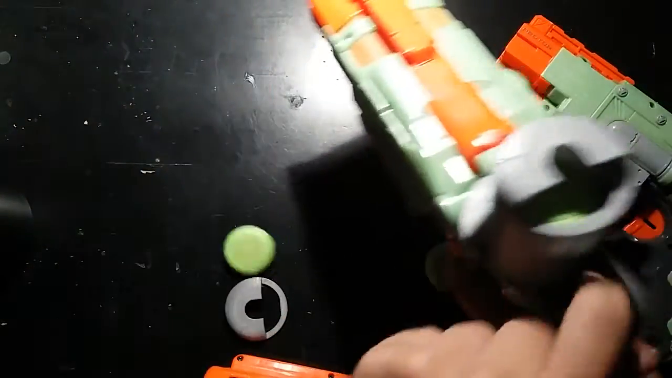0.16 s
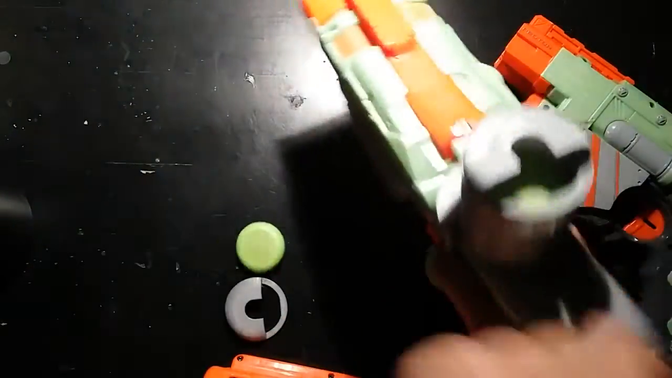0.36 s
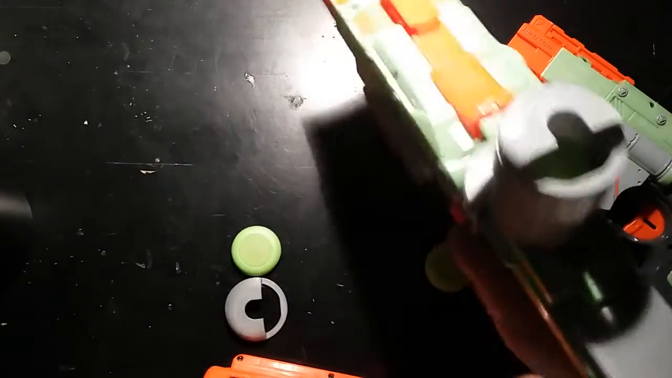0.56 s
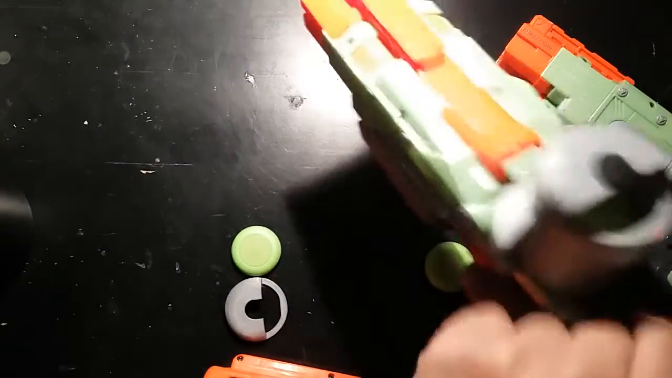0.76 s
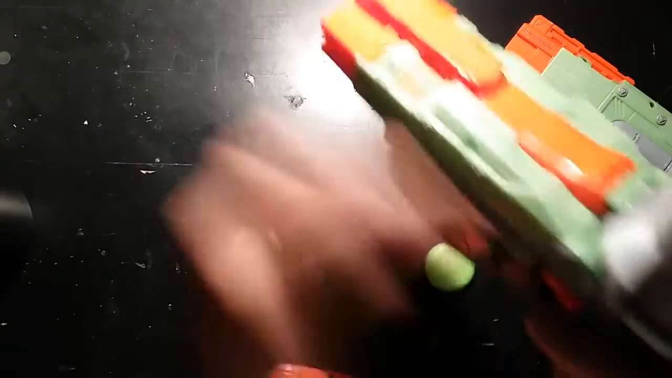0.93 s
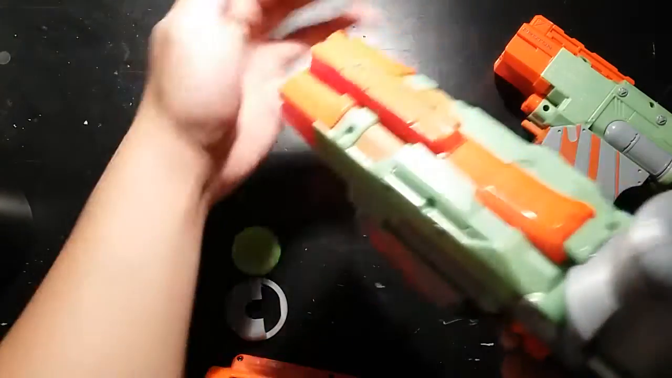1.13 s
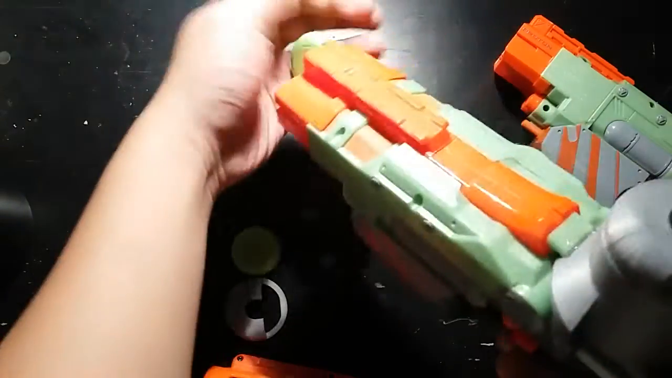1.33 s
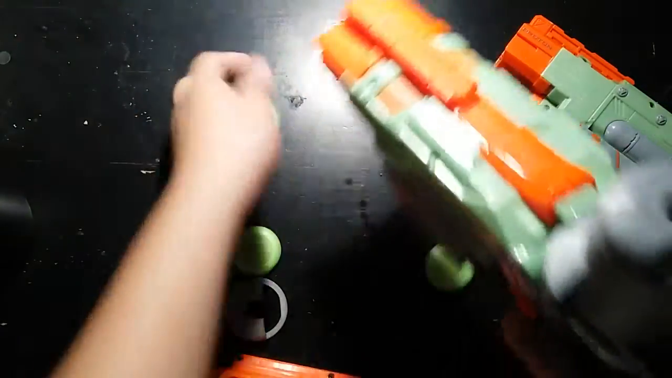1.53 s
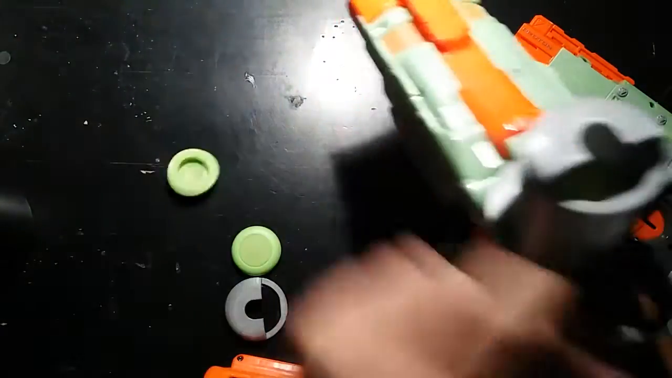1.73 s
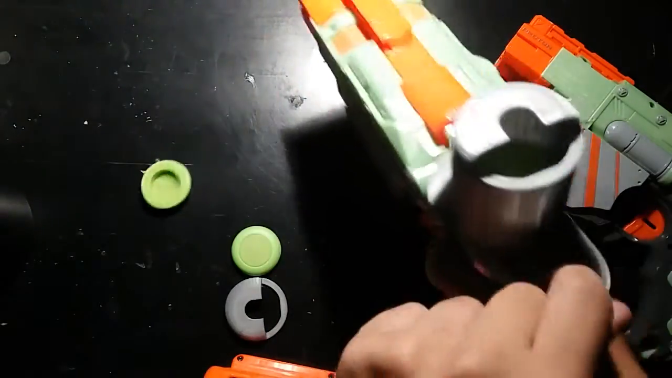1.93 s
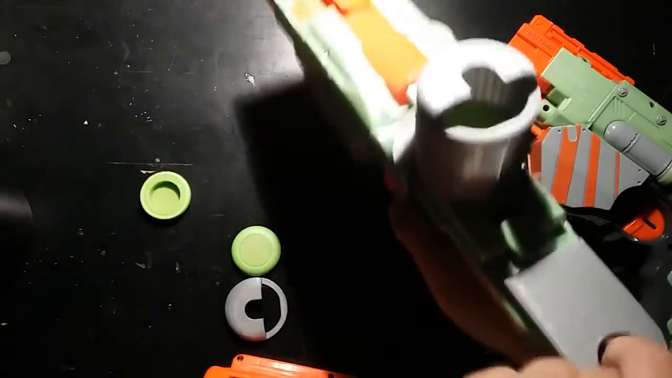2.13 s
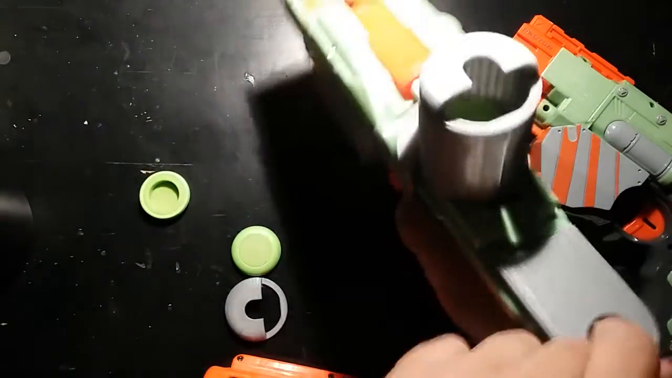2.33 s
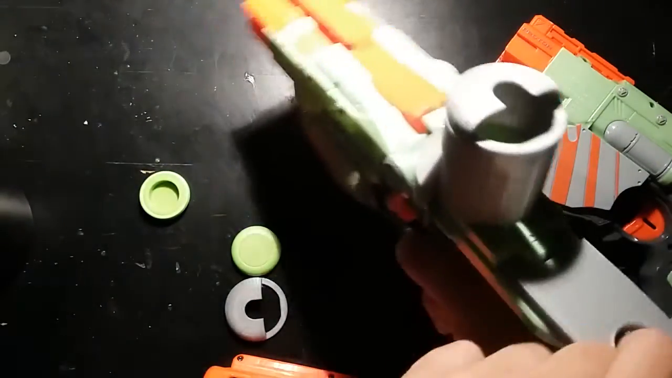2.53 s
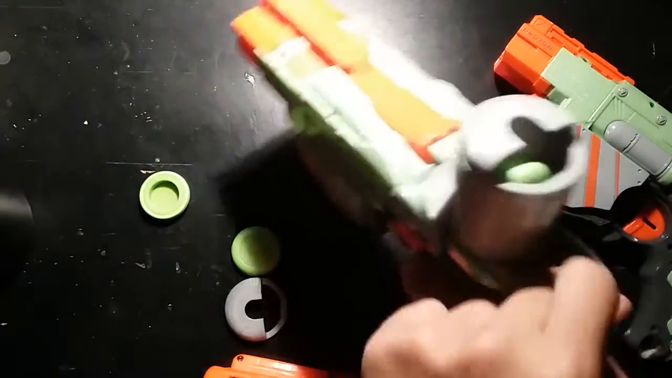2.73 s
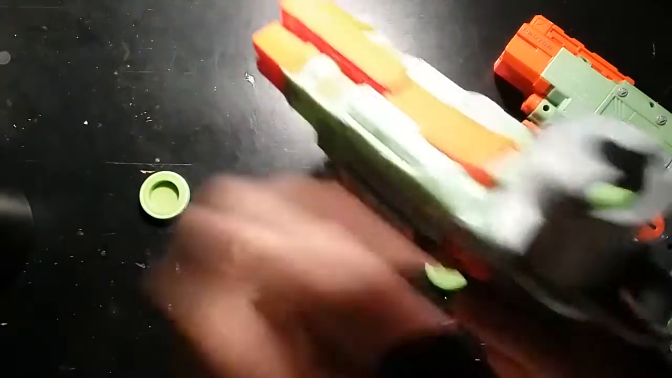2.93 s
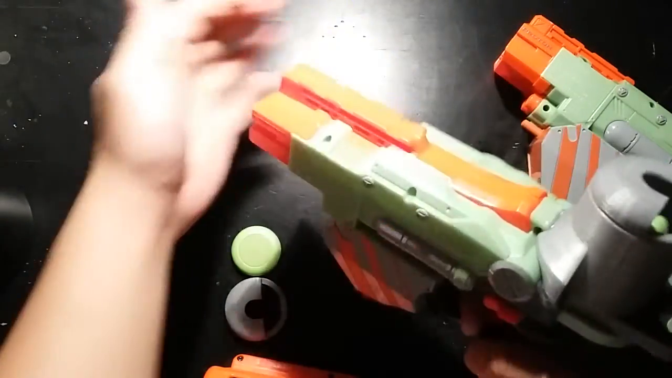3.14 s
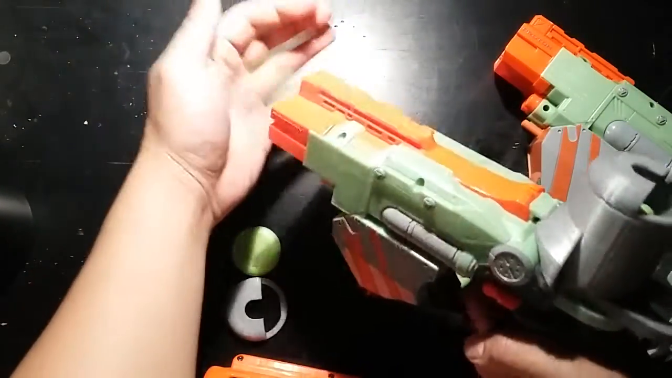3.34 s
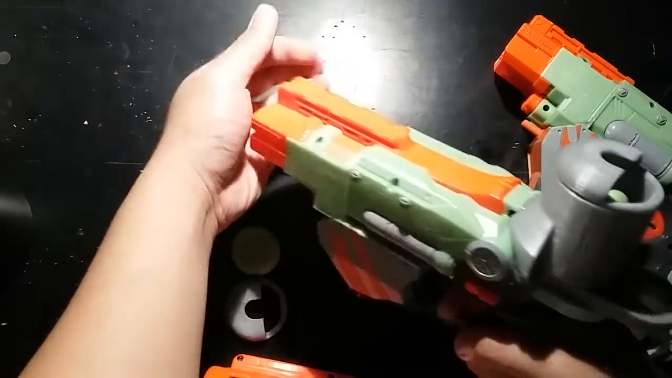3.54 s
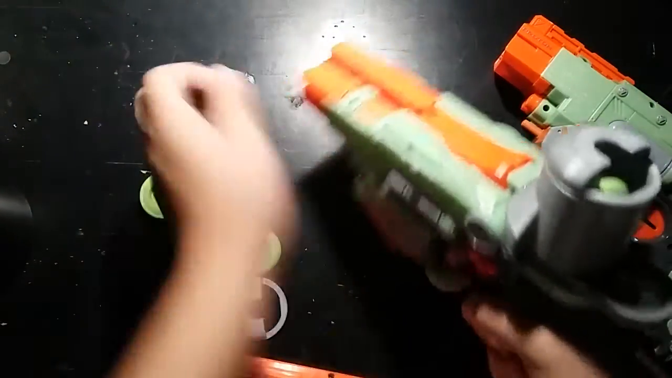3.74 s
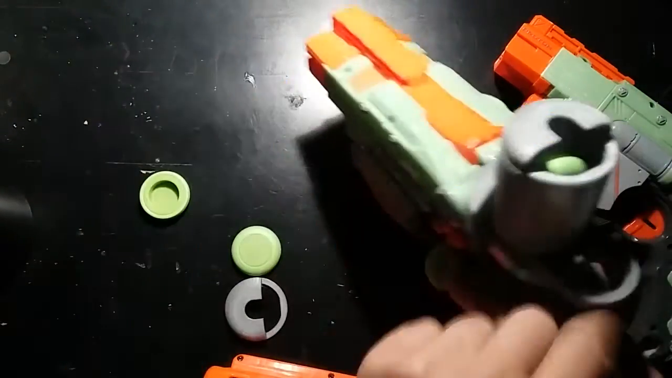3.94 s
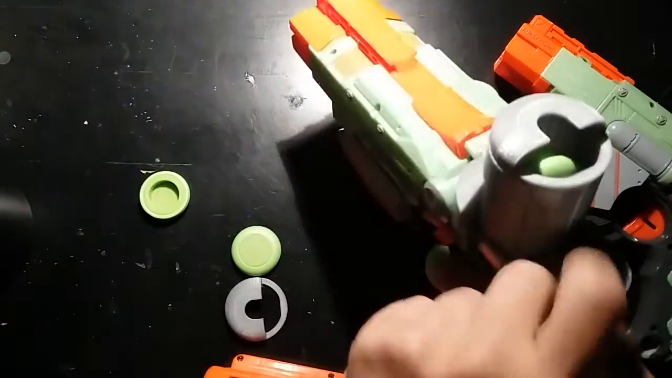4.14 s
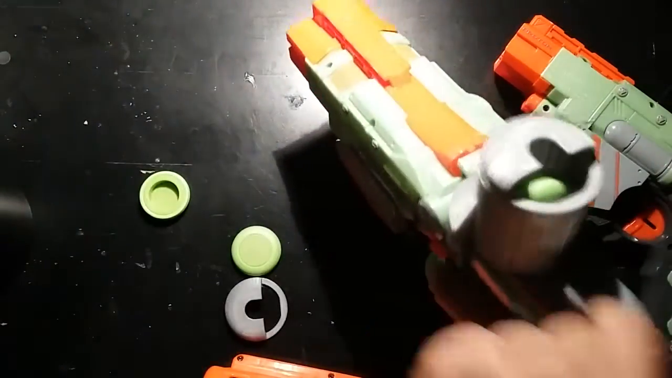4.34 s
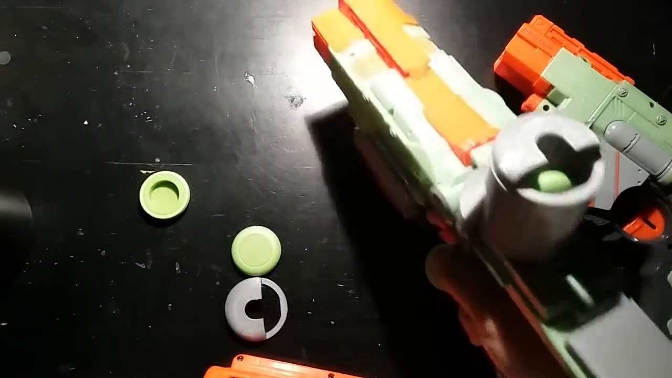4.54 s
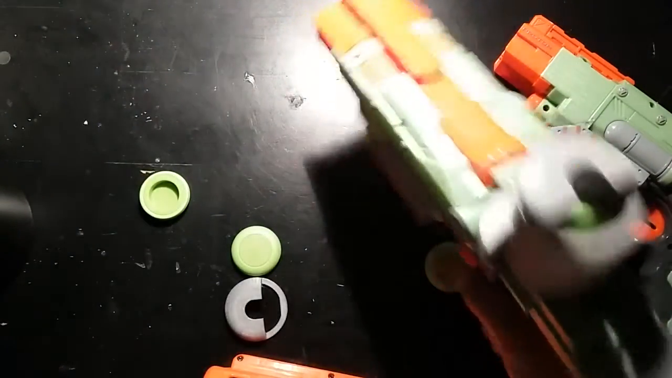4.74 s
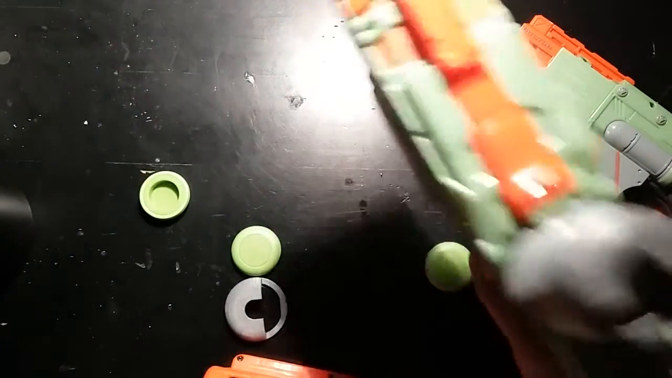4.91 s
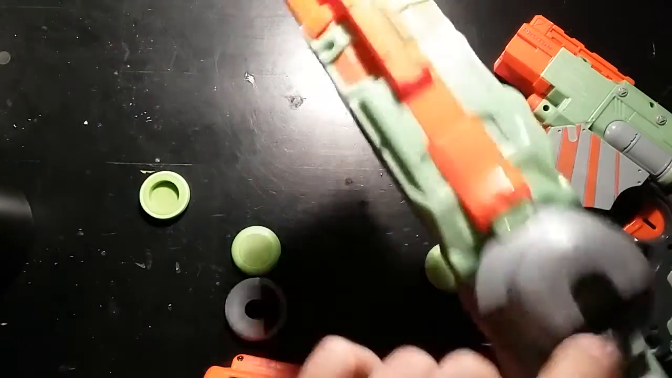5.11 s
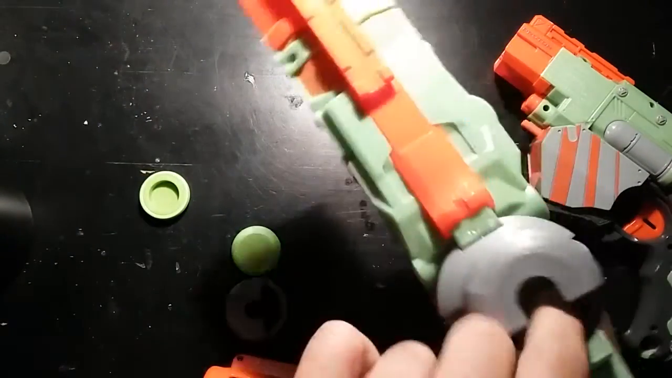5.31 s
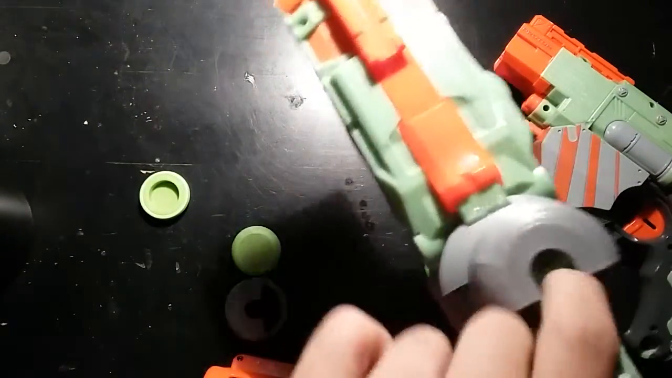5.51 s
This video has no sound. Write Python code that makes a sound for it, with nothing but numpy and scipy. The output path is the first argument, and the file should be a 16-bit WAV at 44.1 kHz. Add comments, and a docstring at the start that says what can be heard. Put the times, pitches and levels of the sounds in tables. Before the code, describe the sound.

Close, hard plastic snaps and slide slams from a toy disc launcher, two springy shots, a dull table thud, then quiet fumbling.

```python
"""A plastic toy disc blaster over a table in a small room, heard by one close microphone.
The slide is pulled, scraping over its catches, and slams through the hollow shell; a first shot
follows and leaves the spring ringing. A second pull and a second shot come next, then discs and
hands thump the tabletop. After a third pull, fingers rub and drag over the magazine to the end.
Blows are coloured noise and ringing modes, rubs are dense tiny catches; air and a low drone lie below."""
import sys
import numpy as np
from scipy import signal
from scipy.fft import rfft, irfft, next_fast_len
from scipy.io import wavfile
from scipy.ndimage import uniform_filter1d

SR = 44100
rng = np.random.default_rng(int(sys.argv[2]) if len(sys.argv) > 2 else 0)


def log_audio(samples):
    """Write samples as a 16-bit WAV file to the path given in sys.argv[1]."""
    # one column per channel
    frames = np.atleast_2d(samples).T
    # limit to full scale, then quantise
    limited = np.clip(frames, -1, 1)
    pcm = np.round(limited * 32767).astype(np.int16)
    wavfile.write(sys.argv[1], SR, pcm)


N = 250047
TIME = np.arange(N) / SR
RING = np.arange(2 ** 15) / SR  # the time axis of one ringing sound, in seconds


def undb(db):
    """Decibels to gain."""
    return 10 ** (np.asarray(db) / 20)


def unit(x):
    """Scale to rms 1."""
    return x / np.sqrt(np.mean(x ** 2))


def fade(t, t60):
    """Exponential decay, 60 dB down after t60."""
    return np.exp(-np.log(1000) * t / t60)


def add(track, s, sound):
    """Mix a sound into a track at time s."""
    i = max(int(s * SR), 0)
    track[i:i + len(sound)] += sound[:N - i]


def resonance(x, hz, q):
    """Two-pole band-pass, gain 1 at the centre."""
    return signal.lfilter(*signal.iirpeak(hz, q, fs=SR), x)


def colour(x, points, bass_db=0, treble_db=0):
    """Causal filter through (Hz, dB) points with two shelves; flat shelves keep the power of white noise."""
    size = next_fast_len(len(x) // 2 + 1024) * 2
    f = np.arange(size // 2 + 1) * SR / size + 1
    hz, db = np.transpose(points)
    gain = unit(undb(np.interp(np.log(f), np.log(hz), db)))
    bass_shelf = bass_db / (1 + (f / 1050) ** 4)
    treble_shelf = treble_db / (1 + (5000 / f) ** 3)
    gain = gain * undb(bass_shelf + treble_shelf)
    # folding the cepstrum forward in time gives minimum phase
    cepstrum = irfft(np.log(gain))
    cepstrum[1:size // 2] *= 2
    cepstrum[size // 2 + 1:] = 0
    return irfft(rfft(x, size) * np.exp(rfft(cepstrum)))[:len(x)]


def ring(modes, scatter_db, detune):
    """Struck modes; the point of contact and the grip change their levels and pitch a little."""
    hz, db, t60 = np.transpose(modes)[:, :, None]
    level_chance, pitch_chance = rng.uniform(-1.2, 1, (2, len(modes), 1))
    t = RING[:int(min(t60.max(), RING[-1]) * SR)]
    sign = (-1) ** np.arange(len(modes))[:, None]  # neighbouring modes swing in opposite directions
    swing = np.cos(2 * np.pi * hz * (1 + detune * pitch_chance) * t)
    return np.sum(sign * undb(db + scatter_db * level_chance) * fade(t, t60) * swing, axis=0)


def blows(rows, spectrum, modes, modes_db, scatter_db, detune, spread_s, part_db, part_q):
    """Plastic on plastic: a short blur of crowded wall modes, the struck part's resonance, and ringing modes."""
    out, t = np.zeros(N), RING[:2 ** 12]
    for s, db, bass_db, treble_db, t60, part_hz in rows:
        walls = rng.standard_normal(len(t)) * fade(t, max(t60, .01))
        walls *= 1 - np.exp(-t / spread_s)  # the blow takes a moment to spread
        walls *= np.sqrt(SR / 100 / np.sum(walls ** 2))  # the energy of 10 ms at rms 1
        walls += undb(part_db) * resonance(walls, part_hz, part_q)
        shelved = [(hz, mode_db + bass_db / (1 + (hz / 1000) ** 4), decay) for hz, mode_db, decay in modes]
        tones = ring(shelved, scatter_db, detune)
        add(out, s, undb(db) * colour(walls, spectrum, bass_db, treble_db))
        add(out, s, undb(db + modes_db) * tones)
    return out


# The launcher snapping forward and hitting its stop. Each row: start in seconds, level in dB before
# the overall shot gain, bass in dB, treble in dB, t60 in s, resonance of the struck part in Hz.
LAUNCHER_BLOWS = [(1.2836, -15, 1, 2.5, 0.072, 2800), (1.2905, -16, 3.5, -12, 0.05, 1050),
                  (1.296, -19, -1, -6.5, 0.029, 1700), (3.4215, -14.5, -3.5, -4.5, 0.035, 1950),
                  (3.4275, -16.5, 3.5, -0.5, 0.039, 1450), (3.435, -30, 13.5, 8.5, 0.083, 480)]
# How a launcher blow is coloured, close to the microphone. Each row: frequency in Hz, density in dB per Hz.
LAUNCHER_SPECTRUM = [(60, -27.5), (130, -33.5), (350, -3.5), (700, -4.5), (850, -9), (1000, -2.5),
                     (1600, 1.5), (2600, -5.5), (3600, -8.5), (5100, -8), (6500, -23), (8500, -28),
                     (16000, -33.5)]
# What rings in launcher and barrel. Each row: frequency in Hz, relative level in dB, t60 in s.
LAUNCHER_MODES = [(117, -29, 0.25), (201, -25, .14), (259, -23.5, 0.17), (363, -18.5, 0.2),
                  (516.6, -11.5, 0.13), (698.6, 0, 0.078), (1055, -7, 0.038), (1203, -16, .06),
                  (1373, -7.5, 0.039), (1445, -14.5, 0.1), (1555, -5, 0.057), (1770, -17, 0.02),
                  (2018, -9.5, 0.098), (2230, -16.5, .07)]


def shots():
    """Each shot is three quick blows of the launcher, ringing the barrel."""
    return undb(-1.5) * blows(LAUNCHER_BLOWS, LAUNCHER_SPECTRUM, LAUNCHER_MODES, modes_db=-1.5, scatter_db=2.5,
                              detune=.006, spread_s=0.00063, part_db=4.5, part_q=8.0)


# How the hollow shell colours its blows and rubs. Each row: frequency in Hz, density in dB per Hz.
SHELL_SPECTRUM = [(60, -41.5), (180, -17), (340, -6.5), (700, -0.5), (1150, -1), (1700, 1), (3500, -2),
                  (5200, -5.5), (6500, -16), (8500, -22), (12000, -26), (16000, -37.5)]
# What rings in the hollow shell. Each row: frequency in Hz, relative level in dB, t60 in s when no hand damps it.
FREE_SHELL_MODES = [(330, -14.5, 0.16), (413, -13, 0.15), (486, -14.5, 0.29), (706.7, -8, 0.14),
                    (764, -7, 0.18), (833, -14, 0.12), (930, -9, 0.26), (1430, -9, 0.11),
                    (1550, -7.5, 0.25), (1789, -13, 0.03), (2145, -11, 0.2), (2297, -4, 0.097),
                    (2500, -11, .09), (2800, -6.5, 0.17), (3580, -11, 0.069), (4070, -19, 0.11),
                    (4230, -15, 0.19), (4910, -8, 0.023)]


def shell_blows(rows, free=0.74, **settings):
    """Blows on the shell, whose modes keep only a share of their ring time in the damping hand."""
    gripped = [(hz, db, t60 * free) for hz, db, t60 in FREE_SHELL_MODES]
    return blows(rows, SHELL_SPECTRUM, gripped, **settings)


# The slide slamming into either end. Each row: time of the stop in seconds, level in dB and level of the
# sear just before in dB (both before the overall slam gain), time between contacts in s, bass in dB,
# resonance in Hz.
SLIDE_SLAMS = [(0.513, -16, -26.5, 0.01, -1, 5060), (0.767, -16.5, -22, 0.0085, 2.5, 4710),
               (2.221, -16, -29, 0.0108, -1.5, 2700), (2.716, -16, -16.5, 0.009, 3, 3630),
               (4.525, -19.5, -24.5, 0.013, 5, 734)]


def slams(graze_db=-4.5, rebound_db=-5, glancing_bass_db=-8.5):
    """A slam is four contacts: the sear trips, the slide grazes its stop, hits it and rebounds."""
    rows = []
    for s, db, sear_db, gap, bass_db, hz in SLIDE_SLAMS:
        rows.append((s, db, bass_db, 6, 0.048, hz))  # the stop: treble 6 dB, t60 0.048 s
        glancing = (s - 2 * gap, sear_db), (s - gap, db + graze_db), (s + gap, db + rebound_db)
        for at, level in glancing:
            rows.append((at, level, bass_db + glancing_bass_db, 2, 0.072, hz))  # treble 2 dB, t60 0.072 s
    return undb(-1.5) * shell_blows(rows, modes_db=-6.0, scatter_db=5.0, detune=.028, spread_s=0.0013,
                                    part_db=-1.5, part_q=11.0)


def light_contact(s, db, treble_db, hz, firm_db=-35.5, part_hz=1400):
    """One light blow on the shell: firmer on a smaller part is thinner, and firmer chatters longer."""
    force = db - firm_db
    # 1 dB of bass at the reference level and pitch, less per dB and per octave above them
    bass_db = 1 - 0.21 * force - 2 * np.log2(hz / part_hz)
    t60 = 0.053 * 2 ** (force / 46)  # doubles every 46 dB
    return s, db, bass_db, treble_db, t60, hz


# The slide leaving its rest on each pull. Each row: start in seconds, level of its catches in dB before
# the overall latch gain, end of its scraping in seconds, level of its scraping in dB.
SLIDE_PULLS = [(0.409, -27, 0.53, -42.5), (2.108, -27.5, 2.18, -41.5), (4.405, -30, 4.53, -44.5)]
# The catches that every pull trips in turn. Each row: time after the start in seconds, level in dB
# relative to the pull, treble in dB, resonance in Hz.
PULL_CATCHES = [(0, -12, 4, 2550), (0.026, -8, -3, 4180), (0.033, -2, 2.5, 2995), (0.056, -10, 12.5, 2100)]
# Latches that touch and then snap shut. Each row: time of the snap in seconds, level in dB before the
# overall latch gain, time since the touch in s, treble in dB, resonance in Hz.
LATCH_SNAPS = [(0.314, -33.5, 0.007, -0.5, 1580), (1.473, -26, 0.0092, 4, 2700),
               (2.009, -30.5, 0.011, 0.5, 1425), (2.679, -29, 0.0075, 2.5, 2560),
               (3.635, -25.5, 0.014, 1, 1870), (4.016, -32, 0.0061, -5.5, 3000),
               (4.403, -31.5, 0.01, 1, 2500)]


def latches(touch_db=-6.5):
    """The sprung parts: the catches along each pull and the two-part snaps."""
    rows = []
    for s, db, _, _ in SLIDE_PULLS:
        for lag, catch_db, treble_db, hz in PULL_CATCHES:
            rows.append(light_contact(s + lag, db + catch_db, treble_db, hz))
    for s, db, lead, treble_db, hz in LATCH_SNAPS:
        rows.append(light_contact(s - lead, db + touch_db, treble_db, hz))
        rows.append(light_contact(s, db, treble_db, hz))
    return undb(-2.5) * shell_blows(rows, modes_db=-5.5, scatter_db=5.5, detune=0.031, spread_s=0.0018,
                                    part_db=3.5, part_q=4.5)


# The released coil, heard close by. Each row: start in seconds, level in dB, middle of its final fade in seconds.
SPRING_RINGS = [(1.297, -35, 1.76), (2.413, -56.5, 2.5), (3.43, -32.5, 3.78)]
# How the crowd of coil modes is coloured. Each row: frequency in Hz, density in dB per Hz.
COIL_SPECTRUM = [(400, -18), (1100, -3), (1450, 0), (2000, 5), (2700, 1), (3200, -2.5), (3800, -3),
                 (5200, -8), (6500, -21.5), (12000, -39.5)]
# The strongest modes of the spring. Each row: frequency in Hz, relative level in dB, t60 in s.
COIL_MODES = [(1470, -6.5, 1.2), (1290, -18, 1.9), (1446, -5.5, .5), (1570, -17.5, 1.3), (2080, -16, 2),
              (2379, -14, 1.3), (2650, -15, 1), (3800, -20, 1.3), (4050, -15.5, 0.67), (4170, -21.5, 1.3),
              (4727, -21.5, 1.1), (5200, -23, 1.5)]


def spring(t60=1.0, settle_s=0.021, modes_db=-1):
    """The released coil shivers in a crowd of slowly fading modes, a few standing out, until it comes to rest."""
    out = np.zeros(N)
    for s, db, end in SPRING_RINGS:
        shiver = unit(colour(rng.standard_normal(len(RING)), COIL_SPECTRUM)) * fade(RING, t60)
        add(shiver, 0, undb(modes_db) * ring(COIL_MODES, scatter_db=2, detune=.002))
        settling = np.clip((end - s - RING) / settle_s + .5, 0, 1)
        add(out, s, undb(db) * shiver * settling)
    return out


# Single clicks of trigger, magazine and discs on the shell, and the sharp contact clicks of three knocks on #
# the tabletop. Each row: time in seconds, level in dB before the overall click gain, treble in dB, resonance in
# Hz.
SHELL_CLICKS = [(0.196, -39, -4.5, 1500), (0.27, -43, -14, 3000), (0.296, -39.5, -2, 1220),
                (0.654, -35.5, -12, 730), (0.673, -38, 0, 700), (0.707, -24, 5.5, 1780),
                (0.73, -23, 8.5, 4650), (0.82, -32.5, -13, 2510), (0.856, -43.5, -12, 1850),
                (0.91, -38, 4, 700), (0.981, -54.5, -5, 1430), (1.119, -53.5, -27.5, 700),
                (1.142, -51, -18, 590), (1.183, -47.5, -3.5, 600), (1.254, -40, -7, 646),
                (1.724, -37, -11, 905), (1.841, -46, -16, 598), (1.879, -35, -5.5, 1570),
                (2.341, -35, -3.5, 1855), (2.358, -36, -1, 694), (2.396, -27.5, 5.5, 2649),
                (2.602, -52.5, -14, 1900), (3.156, -49.5, -29, 2047), (3.352, -43.5, -24, 606),
                (3.982, -48, -1, 596), (4.163, -46, 1.5, 1480), (4.233, -52, -6, 596),
                (4.276, -41.5, -7.5, 950), (4.706, -34, -8, 1680), (4.752, -35, -19, 720),
                (4.902, -46, 2, 850), (4.937, -38.5, -19, 1540), (5.127, -43.5, -16, 860),
                (5.186, -41.5, -17, 1140), (5.232, -39, -44, 1700), (5.336, -39.5, -9, 1260),
                (5.363, -46, 3, 700), (5.426, -46, -4.5, 2090), (5.628, -42.5, -20, 1010)]


def clicks():
    """Each click is one light blow, coloured like a blow on the shell."""
    rows = [light_contact(*click) for click in SHELL_CLICKS]
    return undb(-1.5) * shell_blows(rows, modes_db=-6.5, scatter_db=5.0, detune=.028, spread_s=0.0011,
                                    part_db=4.0, part_q=11)


# Discs and hands landing on the tabletop below the microphone. Each row: time in seconds, level in dB,
# softness corner in Hz before the 1.27 stretch, share of the board's ring time.
TABLE_KNOCKS = [(0.001, -42, 370, 0.26), (0.064, -49.5, 327, 1), (0.2, -50, 300, 1),
                (1.636, -35.5, 740, 0.44), (1.723, -41, 1130, 0.86), (3.757, -27.5, 296, 0.83),
                (3.77, -25.5, 218, 0.78), (3.982, -25.5, 1065, 0.38), (4.233, -41, 548, 0.57),
                (4.377, -42, 456, 0.36)]
# What rings in the tabletop. Each row: frequency in Hz, relative level in dB, t60 in s with no hand resting on it.
BOARD_MODES = [(48, -30.5, 0.41), (103.6, -31.5, 0.6), (143.6, -14, 0.94), (200.2, 1, 0.23),
               (226.6, -7.5, 0.59), (288, -9.5, 0.21), (324.4, 5, 0.082), (397, -6.5, 0.32),
               (502, 0, 0.078), (711, -3, 0.15), (868, 5.5, 0.045), (1074, -8, 0.073), (1200, -60, .04)]
# The low hollow rumble in the knocks and in the dragged magazine. Each row: frequency in Hz, density in dB per Hz.
HOLLOW_SPECTRUM = [(40, -27), (110, -10.5), (170, -2.5), (225, -1.5), (330, -4.5), (450, -8), (900, -34.5),
                   (4000, -50)]


def tabletop(thud_db=-7, thud_t60=0.28):
    """Dull thumps: softer contacts reach fewer high modes of the board; a resting hand damps them."""
    out = np.zeros(N)
    for s, db, corner_hz, free in TABLE_KNOCKS:
        damped = [(hz, mode_db, t60 * free) for hz, mode_db, t60 in BOARD_MODES]
        board = ring(damped, scatter_db=2, detune=.01)
        thud = unit(colour(rng.standard_normal(len(RING)), HOLLOW_SPECTRUM)) * fade(RING, thud_t60)
        softness = signal.butter(5, corner_hz * 1.27, fs=SR, output="sos")
        add(out, s, undb(db) * signal.sosfilt(softness, board))
        add(out, s, undb(db + thud_db) * signal.sosfilt(softness, thud))
    return out


# Soft bumps of the palm on the grip. Each row: start in seconds, level in dB, pitch in Hz, t60 in s.
PALM_BUMPS = [(1.59, -49.5, 74, 0.18), (3.756, -23, 135.6, 0.19), (3.757, -35, 97, 0.66),
              (3.757, -45, 48.4, .45), (5.321, -34.5, 133, 0.23)]
# The hand dragging over the hollow magazine. Each row: time in seconds, level in dB.
MAGAZINE_DRAG = [(4.6, -80), (4.85, -58.5), (4.93, -56.5), (5.25, -54), (5.42, -65.5), (5.67, -63)]


def handling(push_s=0.0036, unsteady_db=1.5):
    """The palm bumps the grip with slow, soft pushes and drags unevenly over the magazine."""
    pressure = unit(uniform_filter1d(rng.standard_normal(N), size=1800))  # averaged over about 41 ms
    drag_db = np.interp(TIME, *np.transpose(MAGAZINE_DRAG)) + unsteady_db * pressure
    out = unit(colour(rng.standard_normal(N), HOLLOW_SPECTRUM)) * undb(drag_db)
    for s, db, hz, t60 in PALM_BUMPS:
        push = 1 - np.exp(-(RING / push_s) ** 2)
        add(out, s, undb(db) * push * fade(RING, t60) * np.sin(2 * np.pi * hz * RING))
    return out


# Plastic rubbing under the fingers. Each row: start in seconds, end in seconds, level in dB, catches per second,
# treble in dB.
FINGER_RUBS = [(0.297, 0.44, -53.5, 350, -4), (0.587, 0.715, -51, 137, -4), (2.388, 2.402, -40, 2100, -5),
               (2.653, 2.684, -52.5, 950, 7), (3.335, 3.419, -62, 100, -31), (4.131, 4.168, -56, 370, -10),
               (4.69, 5.67, -62.5, 1300, 2), (4.868, 5.304, -61, 45, -33)]


def slides(rush_s=0.042, rush_db=2.5):
    """Every sliding contact: the fingers, and the slide, which scrapes harder in its last moment."""
    rows = [(start, end, db, rate, 9.5, treble_db) for start, end, db, rate, treble_db in FINGER_RUBS]  # bass 9.5 dB
    for s, _, end, db in SLIDE_PULLS:
        third_catch = s + PULL_CATCHES[2][0]
        for start, level in (third_catch, db), (end - rush_s, db + rush_db):
            rows.append((start, end, level, 260, 3, -2))  # 260 catches/s, bass 3 dB, treble -2 dB
    return rows


def rubbing(spread_db=10.5, catch_t60=0.11):
    """Sliding contact: tiny uneven catches, each briefly ringing the shell."""
    out = np.zeros(N)
    tail = fade(RING[:2 ** 11], catch_t60) ** 2  # decay of power
    size = 2 ** 16
    for start, end, db, rate, bass_db, treble_db in slides():
        dice, force, grain = rng.random(size), rng.exponential(size=size), rng.standard_normal(size)
        sliding = np.arange(size) / SR < end - start
        strength = unit(undb(spread_db * np.minimum(force, 2)))
        catches = sliding * (dice < rate / SR) * strength * np.sqrt(SR / rate)
        power = np.abs(signal.fftconvolve(catches ** 2, tail / tail.sum())[:size])
        add(out, start, undb(db) * colour(np.sqrt(power) * grain, SHELL_SPECTRUM, bass_db, treble_db))
    return out


# Loose parts ticking while the grip shifts. Each row: start in seconds, end in seconds, middle level in dB,
# treble in dB.
GRIP_FIDGETS = [(3.19, 3.33, -60.5, -28), (5.02, 5.29, -50.5, -16)]


def ticks(gap_s=0.038, scatter_db=3.5, middle_hz=2480):
    """Faint ticks of loose parts, uneven in time, strength and pitch."""
    rows = []
    for start, end, db, treble_db in GRIP_FIDGETS:
        slots = np.arange(start, end, gap_s)
        chance = rng.uniform(-1, 1, (len(slots), 3))
        for s, (late, force, pitch) in zip(slots, chance):
            at, level, hz = s + gap_s * late / 2, db + scatter_db * force, middle_hz * 2 ** pitch
            rows.append((at, level, -3, treble_db, 0.055, hz))  # bass -3 dB, t60 0.055 s
    return shell_blows(rows, modes_db=-10.5, scatter_db=5.5, detune=.028, spread_s=0.0009, part_db=9.5, part_q=6)


# The quiet air around the microphone. Each row: frequency in Hz, density in dB per Hz.
AIR_SPECTRUM = [(20, -23.5), (45, -10), (80, 1), (200, -3), (500, -7.5), (1000, -15), (1550, -13),
                (2100, -18.5), (4100, -28.5), (5600, -38), (15000, -34.5)]
# A low drone that comes and goes. Each row: time in seconds, level in dB.
DRONE_LEVEL = [(0, -61.5), (0.5, -59), (0.95, -65), (1.15, -90), (5.67, -64.5)]


def background(air_db=-63.5, drone_hz=77, drone_q=7):
    """Quiet room air is coloured noise; the narrow low drone is noise through two resonances."""
    air = undb(air_db) * unit(colour(rng.standard_normal(N), AIR_SPECTRUM))
    narrow = resonance(rng.standard_normal(N), drone_hz, drone_q)
    drone = unit(resonance(narrow, drone_hz, drone_q))
    return air + drone * undb(np.interp(TIME, *np.transpose(DRONE_LEVEL)))


# The small room's echo. Each row: frequency in Hz, t60 in s, relative level in dB.
ROOM_BANDS = [(100, .3, -4.5), (400, 0.39, 2), (1500, 0.51, -3.5), (4500, 0.37, -0.5), (8000, 0.3, 1),
              (15000, 0.3, 5)]


def room(x, wet_db=-11, wall_db=4, wall_s=0.037, wall_width_s=0.018, build_s=0.0037):
    """Small room: a diffuse tail, swelling with the near walls' echoes, whose middle outlasts bass and treble."""
    hz, t60, db = np.transpose(ROOM_BANDS)
    noise = rfft(rng.standard_normal(len(RING)))
    log_f = np.log(np.arange(len(noise)) * SR / len(RING) + 1)
    bands = [irfft(noise * np.interp(log_f, np.log(hz), share)) for share in np.eye(len(hz))]
    tail = np.sum(undb(db)[:, None] * fade(RING, t60[:, None]) * bands, axis=0)
    walls = 1 + undb(wall_db) * np.exp(-((RING - wall_s) / wall_width_s) ** 2) / 2
    tail *= np.minimum(RING / build_s, 1) * walls
    return x + undb(wet_db) * signal.fftconvolve(x, tail / np.sqrt(np.sum(tail ** 2)))[:N]


def scene():
    """Blaster and table in the room, the same in both channels."""
    blaster = shots() + slams() + latches() + clicks() + rubbing() + ticks()
    mono = room(blaster) + spring() + tabletop() + handling() + background()
    return np.array([mono, mono])


def record(dry, low_cut_hz=42, top_hz=16200, ceiling=1.1):
    """The microphone thins the deep bass, rounds the loudest peaks and cuts the top."""
    thin = signal.sosfilt(signal.butter(4, low_cut_hz, "high", fs=SR, output="sos"), dry)
    rounded = ceiling * np.tanh(thin / ceiling)
    return signal.sosfilt(signal.ellip(10, .2, 70, top_hz, fs=SR, output="sos"), rounded)


dry = scene()
out = record(dry)
log_audio(out)
```